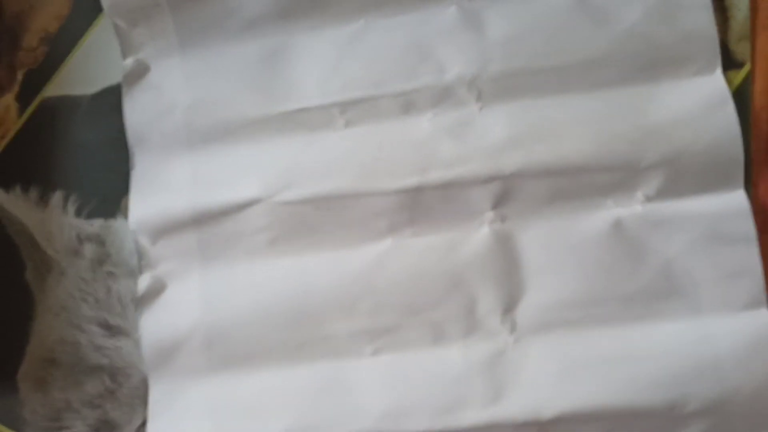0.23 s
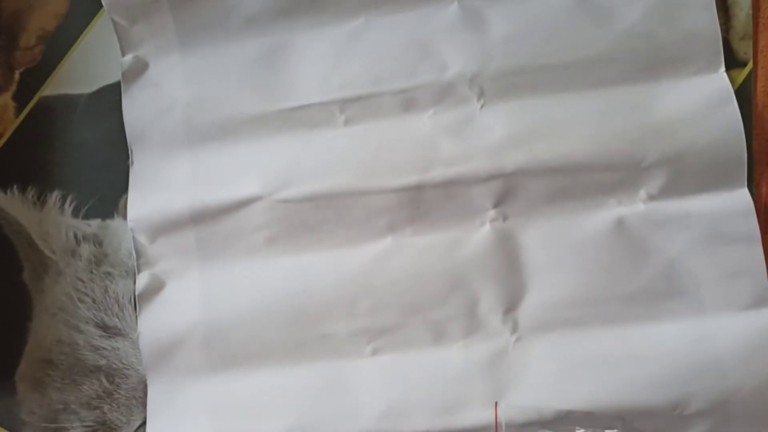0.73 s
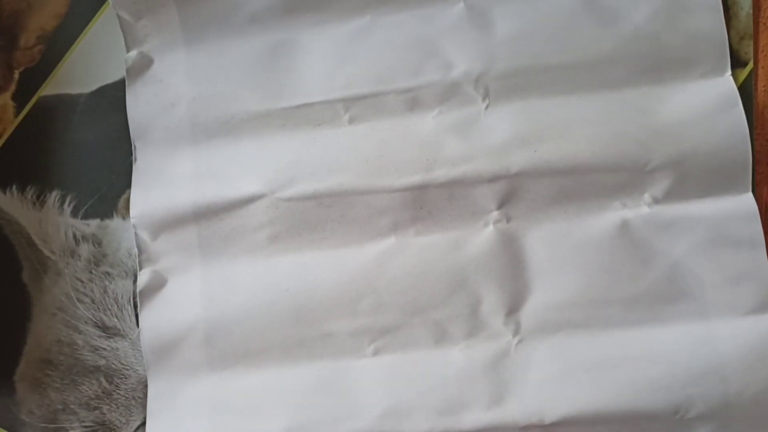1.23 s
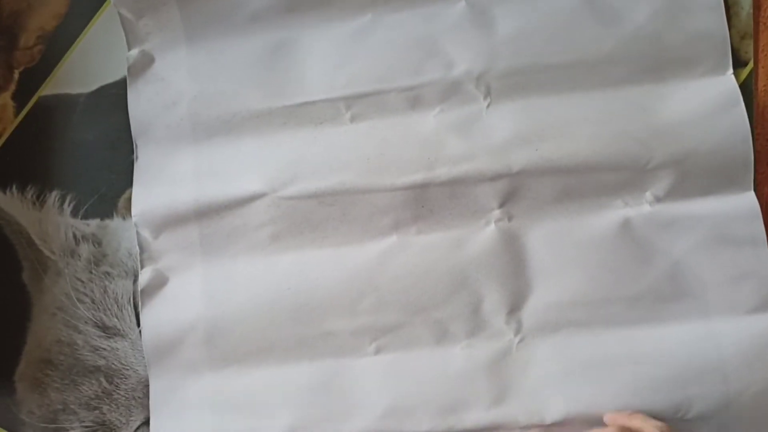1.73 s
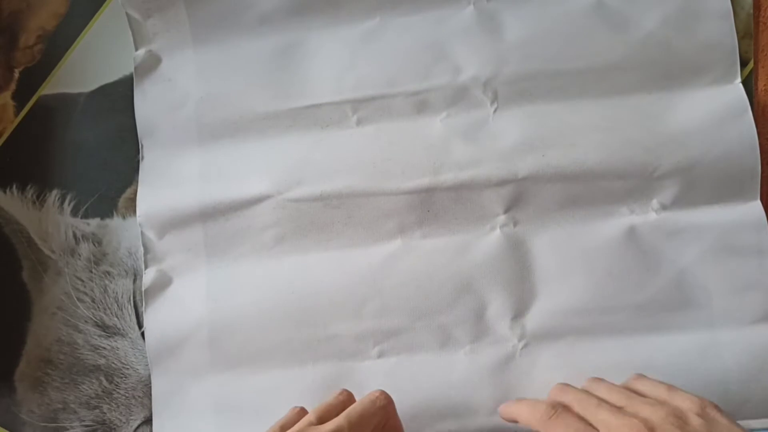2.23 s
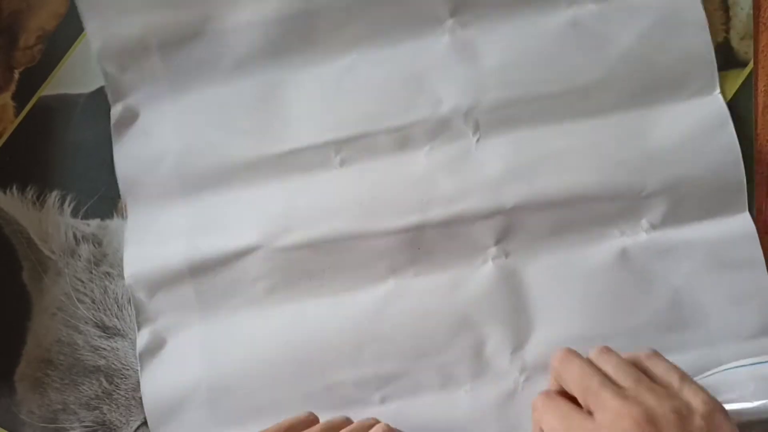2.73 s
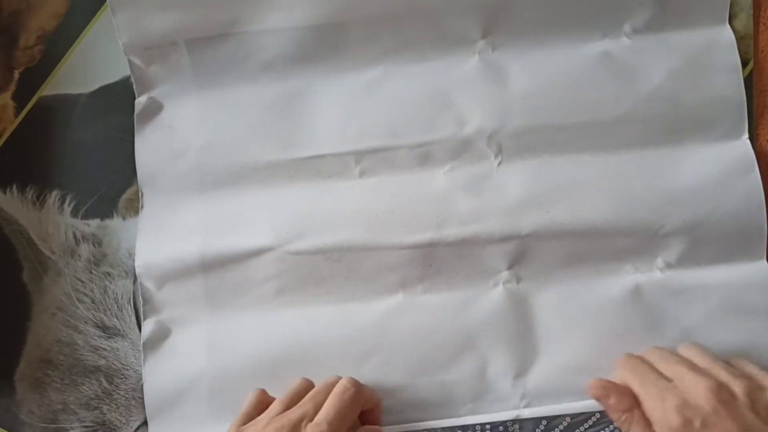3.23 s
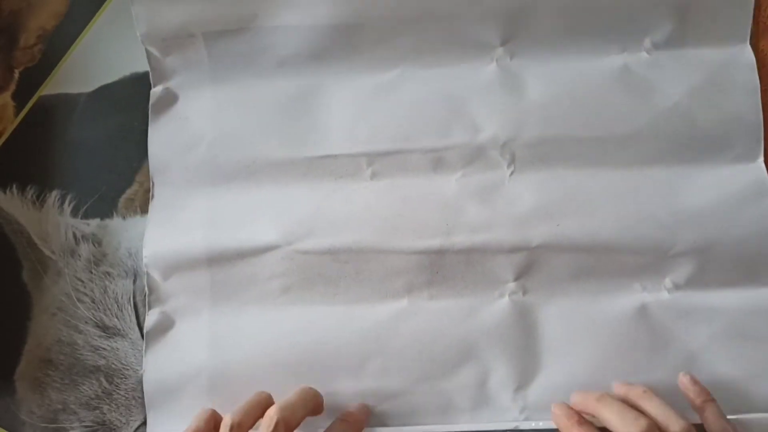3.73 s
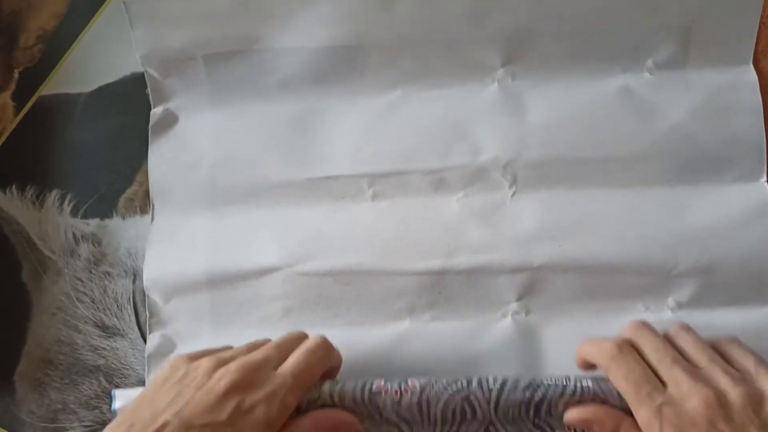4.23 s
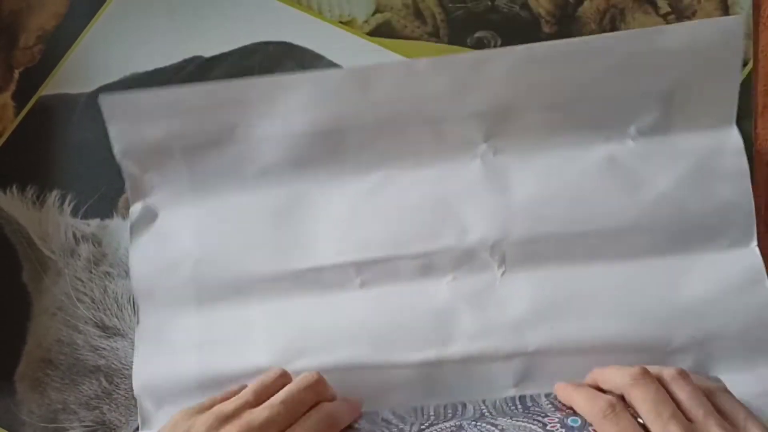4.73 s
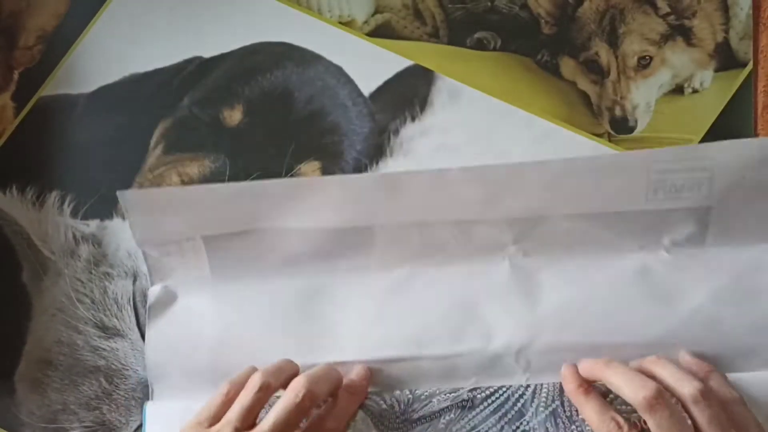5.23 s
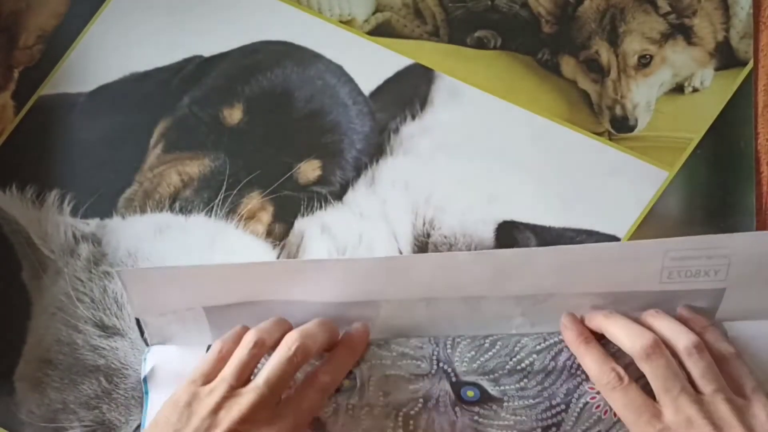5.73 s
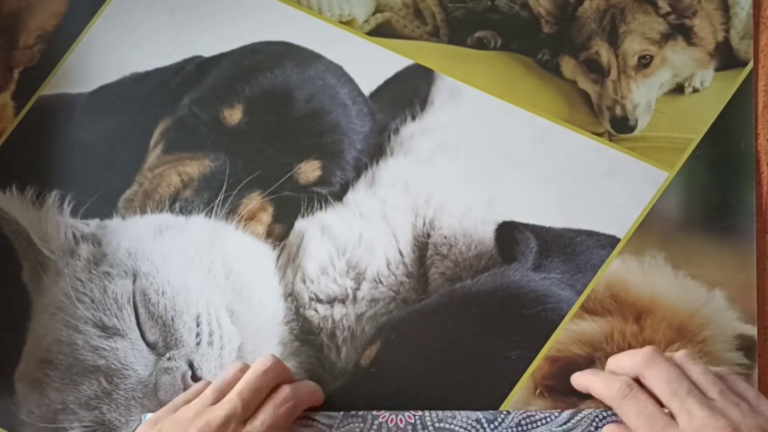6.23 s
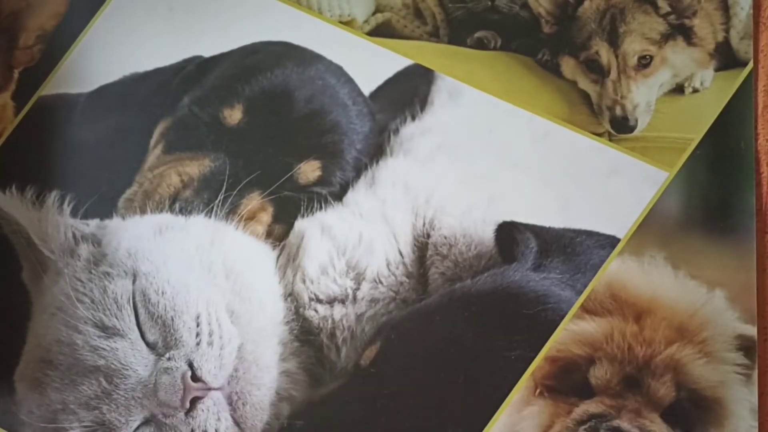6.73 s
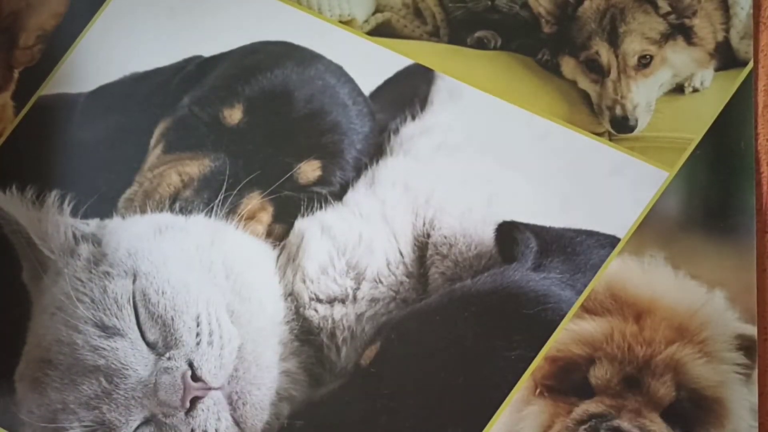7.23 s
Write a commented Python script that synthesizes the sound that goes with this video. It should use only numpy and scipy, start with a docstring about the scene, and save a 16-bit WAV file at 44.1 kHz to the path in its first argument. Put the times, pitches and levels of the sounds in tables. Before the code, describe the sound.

Close stereo sound of a coated, canvas-like sheet being pulled across a table indoors. It starts crisp and busy, with bright ticks, short grainy rubs and hollow snaps, bursts into a loud crumple at two seconds, snaps again just after three, crackles near four, then drags in gentler swishes and fades to faint room rumble.

```python
"""A quiet room: on a table, close under a phone, hands roll up a large creased, coated canvas sheet.
Sliding is grainy noise in rasp, hiss and table-top thrum, rising with each tug of the hands.
Creases buckle with short hollow pops, the coating cracks with bright ticks, flaps thump and folds scrape.
Table and walls answer briefly over a low room rumble; two microphone ports colour the treble differently."""
import sys
import numpy as np
from scipy import signal
from scipy.fft import rfft, irfft, next_fast_len
from scipy.io import wavfile
from scipy.ndimage import uniform_filter1d, map_coordinates

SR = 44100
rng = np.random.default_rng(int(sys.argv[2]) if len(sys.argv) > 2 else 0)


def volts(x):
    """Linear amplitude factor 10**(x/20) for a level x in dB, scalar or array-like."""
    e = np.asarray(x, float) / 20
    return 10 ** e


def file_out(sig):
    """Save sig as 16-bit WAV at sys.argv[1]."""
    # one column per channel
    cols = np.atleast_2d(sig).T
    # limit, then scale
    lim = np.clip(cols, -1, 1)
    pcm = np.round(lim * 32767).astype(np.int16)
    wavfile.write(sys.argv[1], SR, pcm)


N = 330309  # samples

# Tugs of the hands, each a short swish. Each row: peak time in seconds, rasp level in dB, hiss level in dB,
# rise in seconds, fall in seconds; rise and fall are each over 10 dB.
TUGS = [(.03, -45.5, -43, 0.046, 0.04), (0.093, -41, -37.5, 0.011, 0.062),
        (0.236, -38.5, -36.5, 0.018, 0.055), (.29, -56, -41, 0.016, 0.11), (.434, -43, -43.5, 0.13, 0.23),
        (.6, -40.5, -41.5, 0.011, 0.076), (0.659, -38.5, -38.5, 0.055, 0.017),
        (.738, -48.5, -42, 0.078, 0.036), (1.051, -39, -39.5, 0.026, 0.098),
        (1.167, -44, -45, 0.037, 0.016), (1.237, -36.5, -38.5, 0.022, 0.027),
        (1.33, -37, -41, 0.013, 0.091), (1.437, -41.5, -67, 0.097, 0.084), (1.54, -40, -37, 0.0054, 0.024),
        (1.578, -35, -36.5, 0.05, 0.064), (1.84, -37, -39.5, 0.12, 0.18), (2.06, -37, -38.5, 0.045, 0.1),
        (2.12, -38.5, -39.5, 0.05, 0.08), (2.205, -50, -41.5, 0.031, 0.018), (2.27, -46, -38, 0.031, 0.012),
        (2.4, -48, -49.5, 0.28, 0.12), (2.594, -38.5, -39, 0.064, 0.07), (2.784, -40.5, -39, 0.1, 0.049),
        (2.868, -41.5, -52, 0.25, 0.057), (3.028, -49.5, -65, 0.15, 0.059), (3.16, -44, -51.5, 0.054, 0.14),
        (3.238, -37, -36, 0.0099, 0.048), (3.337, -41, -51.5, 0.11, 0.097),
        (3.482, -40.5, -46.5, 0.048, 0.095), (3.622, -39, -41.5, 0.043, 0.064),
        (3.766, -38, -48.5, 0.029, 0.038), (3.84, -43.5, -44, 0.059, 0.049),
        (3.976, -44, -46, 0.016, 0.057), (4.425, -43.5, -46, 0.046, 0.025), (4.55, -55, -57, 0.026, 0.048),
        (4.738, -44, -43.5, 0.0038, 0.11), (4.785, -40.5, -42.5, 0.078, 0.24),
        (5.004, -35.5, -39.5, 0.036, 0.058), (5.103, -42.5, -69, 0.064, 0.014),
        (5.238, -49, -52.5, 0.054, 0.21), (5.417, -46, -45, 0.06, 0.05), (5.837, -65, -52.5, 0.047, 0.05),
        (5.927, -47.5, -56, 0.019, 0.084), (6.055, -43.5, -45, 0.03, 0.071),
        (6.134, -65, -34.5, 0.052, 0.068), (6.24, -47.5, -71, 0.052, 0.098), (6.6, -46, -45.5, 0.014, 0.11),
        (6.7, -55, -62, 0.13, 0.18), (7.15, -64, -62, 0.12, 0.12)]
# The sheet dragging steadily between tugs. Each row: time in seconds, rasp level in dB, hiss level in dB.
STEADY_DRAG = [(0, -63, -43.5), (.19, -56.5, -77), (.5, -62, -51), (.93, -51.5, -50), (1.7, -54.5, -49.5),
               (2.5, -48.5, -55.5), (3, -67, -53.5), (3.7, -56, -61), (4.28, -44, -44.5), (4.6, -48, -56),
               (5.2, -58.5, -75.5), (5.5, -57, -54.5), (5.7, -53.5, -57), (6, -59.5, -69), (6.4, -68, -67),
               (6.56, -52, -55), (6.77, -73, -50.5), (6.87, -90, -63.5), (7.49, -69.5, -74)]
# The sheet's weight on the table top. Each row: time in seconds, hum level in dB at a usual rasp.
SHEET_WEIGHT = [(0, -56.5), (.3, -57.5), (1.15, -58.5), (1.6, -59), (2.1, -58.5), (3.2, -60), (4.26, -56),
                (5, -58.5), (5.8, -54.5), (6.6, -50.5), (7.49, -54)]
# How crackly the sheet is: creased at first, gentler once it slides flat or is rolled.
# Each row: time in seconds, change in dB.
CRACKLINESS = [(0, 1), (3.9, -.5), (4.2, 1.5), (4.4, -2), (4.6, -8), (5, -7), (5.2, -4), (5.9, -2),
               (6.05, -9), (7.49, -3)]
# Spectrum of the sheet's rasp. Each row: frequency in Hz, relative level in dB per Hz.
RASP_SPECTRUM = [(300, -35), (650, -13), (800, -9), (1300, -3), (2500, -3), (3400, -6.5), (4200, -25.5),
                 (7000, -19.5)]
# Spectrum of the coating's hiss. Each row: frequency in Hz, relative level in dB per Hz.
HISS_SPECTRUM = [(1500, 2), (3500, 5), (5000, -3), (10000, 3), (15500, 4)]
# Spectrum of the table top's thrum. Each row: frequency in Hz, relative level in dB per Hz.
THRUM_SPECTRUM = [(90, 5), (170, 4.5), (270, 0), (325, 6.5), (375, 0.5), (428, 6.5), (520, -1), (900, -4)]
# The clearest creases buckling. Each row: start in seconds, level in dB, pitch in Hz, length in seconds.
CLEAR_POPS = [(0.081, -32, 2150, 0.0039), (0.229, -31, 2050, 0.0046), (0.281, -36, 2180, 0.0035),
              (0.3, -36, 1920, 0.0027), (0.467, -32, 2100, 0.0024), (0.58, -28.5, 2070, 0.0039),
              (0.612, -30, 1380, 0.0028), (0.655, -31.5, 1400, 0.0043), (0.773, -40.5, 1190, 0.0053),
              (1.08, -30, 1540, 0.0033), (1.114, -33, 1800, 0.0014), (1.14, -27.5, 1410, 0.0033),
              (1.165, -25.5, 1293, 0.0025), (1.1693, -27.5, 1400, 0.0045), (1.219, -30, 1020, 0.0024),
              (1.225, -30.5, 1410, .005), (1.268, -25, 2900, 0.0013), (1.3153, -30.5, 1500, 0.0023),
              (1.321, -25.5, 1680, 0.002), (1.337, -28, 1480, 0.0076), (1.5688, -28, 840, 0.0045),
              (1.577, -24.5, 1140, 0.0044), (1.588, -29, 1100, 0.0025), (1.645, -32, 1170, 0.0021),
              (1.843, -31.5, 1275, 0.0063), (1.872, -24.5, 1490, 0.0019), (1.955, -32, 1280, 0.0072),
              (1.995, -29, 1310, 0.0027), (2.0114, -26.5, 1060, 0.005), (2.0225, -20.5, 1220, 0.0029),
              (2.039, -16.5, 1130, 0.0011), (2.048, -18.5, 1263, 0.0066), (2.0653, -25, 1160, 0.0026),
              (2.0845, -18.5, 1070, 0.0017), (2.092, -26.5, 1430, 0.0076), (2.109, -33, 1190, 0.0036),
              (2.118, -23.5, 1180, 0.002), (2.139, -26, 1240, 0.0034), (2.1493, -22, 1180, 0.0035),
              (2.196, -28, 1810, 0.0019), (2.201, -26, 965, 0.0032), (2.243, -26, 1074, 0.0045),
              (2.354, -31, 2200, 0.0041), (2.3914, -33.5, 1120, 0.0065), (2.505, -36, 1600, 0.0023),
              (2.551, -33.5, 1284, 0.0063), (2.577, -31, 1180, 0.0045), (2.604, -24.5, 1300, 0.0024),
              (2.624, -32.5, 1280, 0.0078), (2.691, -26.5, 1980, 0.0038), (2.851, -35, 1210, 0.0045),
              (2.8867, -28, 1360, 0.0048), (2.901, -32.5, 1080, 0.0044), (2.9525, -39, 1300, 0.0033),
              (3.0375, -28.5, 1260, 0.0021), (3.1565, -34.5, 1450, 0.003), (3.207, -32, 1280, 0.005),
              (3.214, -34.5, 1190, 0.0028), (3.2288, -22.5, 1270, 0.0048), (3.231, -15.5, 1252, 0.0064),
              (3.239, -18.5, 1400, 0.0033), (3.242, -30, 1070, 0.0094), (3.318, -31.5, 1090, 0.0049),
              (3.398, -37, 1016, 0.008), (3.499, -34, 1153, 0.0099), (3.92, -37, 1286, 0.0076),
              (3.949, -28, 1040, 0.004), (4.137, -36, 1116, 0.0052), (4.2437, -29, 970, 0.0027),
              (4.294, -36, 2640, 0.0018), (4.3434, -31, 960, 0.0046), (5.102, -38, 1640, 0.0092),
              (5.186, -44.5, 1440, 0.0028), (5.288, -37, 620, 0.0053), (5.335, -40.5, 1180, 0.0042),
              (5.685, -44, 1480, 0.0017), (5.788, -35, 1620, 0.0015), (5.892, -44.5, 1210, 0.009),
              (5.965, -40.5, 1880, 0.0036), (5.916, -39.5, 1160, 0.0045), (5.927, -47, 1610, 0.0051),
              (6.329, -44.5, 750, 0.0055), (6.862, -52, 760, 0.0044), (6.94, -50, 1000, 0.002),
              (6.9628, -46.5, 920, 0.0024), (7.353, -49.5, 1020, 0.0032)]
# The clearest cracks of the coating. Each row: start in seconds, level in dB, pitch in Hz.
CLEAR_TICKS = [(0.028, -28, 8100), (0.0408, -26, 14000), (0.0803, -20, 11500), (0.2323, -27, 12100),
               (0.24, -20, 12800), (0.246, -25, 11600), (0.2507, -28, 12300), (0.2967, -25, 8400),
               (0.3024, -21, 12600), (0.3922, -28, 5500), (0.4254, -18, 11900), (0.441, -23, 13600),
               (0.4646, -20, 12700), (0.5822, -25.5, 14200), (0.6538, -18.5, 11500), (0.6584, -30, 4830),
               (0.7405, -20.5, 12400), (0.7669, -25, 13800), (0.8566, -32, 5300), (1.166, -32, 8000),
               (1.229, -33, 5760), (1.2665, -30, 12600), (1.2717, -34, 12100), (1.3154, -25, 13300),
               (1.322, -22.5, 11900), (1.3357, -23, 9000), (1.375, -27, 6440), (1.4769, -26.5, 8150),
               (1.5197, -30, 8500), (1.542, -18, 11900), (1.7327, -27, 6800), (1.8752, -28, 5700),
               (2.0276, -19, 11700), (2.0844, -28, 12400), (2.1222, -30, 12500), (2.1384, -18, 12500),
               (2.1976, -21, 14000), (2.5924, -23, 12500), (2.692, -36, 11900), (2.8438, -33, 5360),
               (2.888, -32, 12800), (3.2304, -26.5, 7740), (3.4426, -27, 12100), (3.5401, -32.5, 12200),
               (3.5774, -34, 12400), (3.8916, -33, 11900), (3.966, -33, 12100), (3.9773, -30, 12200),
               (4.0038, -29, 6300), (4.0281, -30, 12100), (4.0487, -27, 8000), (4.1093, -28, 7300),
               (4.1325, -19, 7900), (4.1548, -18.5, 7700), (4.1863, -21, 8000), (4.211, -29, 5740),
               (4.2228, -25, 7650), (4.2373, -26, 6500), (4.261, -24.5, 6400), (4.6564, -30.5, 12000),
               (4.7065, -34, 12100), (5.1953, -35.5, 6700), (5.2893, -34, 12200), (5.6097, -28, 11900),
               (5.6854, -39, 11700), (5.9998, -44.5, 6400), (6.94, -37, 13000), (7.1423, -48, 11850),
               (7.3524, -59, 11500)]
# Spectrum of the splash in a crack. Each row: frequency in Hz, relative level in dB per Hz.
CRACK_SPECTRUM = [(1500, -11), (3000, -0.5), (5000, -3), (10000, 10.5), (15500, 8)]
# Fingers and folds scraping. Each row: start in seconds, length in seconds, start pitch in Hz,
# end pitch in Hz, bandwidth in Hz, level in dB.
SCRAPES = [(0.111, 0.047, 2400, 2320, 250, -46.5), (1.032, 0.037, 1253, 1250, 110, -40.5),
           (1.401, 0.053, 1207, 1170, 90, -40.5), (3.315, 0.04, 1147, 1146, 196, -44),
           (3.612, 0.022, 868, 1266, 100, -41.5), (3.759, 0.038, 1974, 2160, 295, -44.5),
           (3.819, 0.045, 2060, 2147, 537, -36.5), (4.404, 0.037, 1075, 890, 121, -37),
           (4.406, 0.04, 2110, 1400, 367, -39.5), (4.966, 0.056, 823, 1060, 89, -41.5),
           (4.962, 0.056, 1610, 2190, 149, -37), (4.959, 0.054, 2450, 3290, 387, -40),
           (5.013, 0.05, 1592, 1814, 398, -38), (5.785, .085, 6400, 6760, 585, -63),
           (6.104, 0.066, 2050, 2310, 308, -45.5), (6.518, 0.092, 562, 800, 196, -53.5),
           (6.563, 0.075, 1513, 2277, 600, -44), (6.598, 0.085, 2063, 1344, 516, -50.5),
           (6.599, .07, 3000, 3500, 600, -54), (6.659, 0.12, 955, 1160, 397, -51)]
# The sheet slapping the table. Each row: start in seconds, level in dB, pitch in Hz.
THUMPS = [(0.0809, -41, 460), (1.1172, -38, 344), (1.139, -38, 530), (1.1636, -32.5, 330),
          (2.0486, -31, 420), (2.2, -44, 420), (2.4536, -45.5, 346), (2.5867, -44, 480), (3.4984, -43, 357),
          (4.1364, -45, 378), (5.335, -45.5, 620), (5.7304, -44.5, 367), (5.9193, -48, 386),
          (6.0523, -46, 322), (6.963, -49, 228)]
# Decay of table and walls. Each row: frequency in Hz, time to fall 60 dB in seconds.
WALL_DECAY = [(300, 0.35), (1200, 0.15), (4000, 0.18), (12000, 0.14)]
# Spectrum of the quiet room. Each row: frequency in Hz, relative level in dB per Hz.
ROOM_SPECTRUM = [(18, -28), (30, -3.5), (97, 9), (505, -11), (656, -11.5), (830, -11.5), (2420, -48),
                 (9680, -33), (11900, -23), (15500, -28)]
# The rumble comes up at the end. Each row: time in seconds, rise in dB.
ROOM_RISE = [(0, 1), (6.8, 2), (7.2, 6), (7.49, 4.5)]
# Likeness of left and right. Each row: frequency in Hz, correlation from 0 to 1.
LIKENESS = [(60, 0.13), (150, 0.49), (380, 0.76), (950, 0.59), (2380, 0.072), (5980, 0.085), (15000, 0.54)]
# Response of the microphone ports. Each row: frequency in Hz, left gain in dB, right gain in dB.
PORT_RESPONSE = [(29.8, -11, -16.5), (100, -4.5, -2.5), (800, 2, 1.5), (3230, -0.5, -2.5), (4940, 4.5, 4),
                 (5800, 7.5, 0), (6400, 6, 4.5), (8100, 4, -7.5), (10200, -5.5, -2.5), (11500, -9.5, 0),
                 (11700, -4, 6.5), (13250, -9, 4), (15750, -6, -5.5), (16100, -38, -40)]


def handling():
    """Levels of rasp and hiss in dB: the steady drag and every tug of the hands, added as power."""
    t = np.arange(0, N, 32) / SR
    power = 0
    for s, rasp_db, hiss_db, rise, fall in TUGS:
        below_peak_db = 10 * np.where(t < s, (s - t) / rise, (t - s) / fall)
        power = power + volts([[rasp_db], [hiss_db]] - below_peak_db) ** 2
    tugs = np.array([np.interp(np.arange(N) / SR, t, p) for p in power])
    return 10 * np.log10(tugs + volts(curves(STEADY_DRAG)) ** 2)


def slide(rasp_db, hiss_db):
    """Friction on the table: rasp of the sheet, hiss of the coating, thrum of the top."""
    # the top hums along with the rasp, smoothed and swinging less widely
    usual_rasp_db, follow, smooth_s = -46, 0.7, 0.038
    smooth_rasp_db = uniform_filter1d(rasp_db, round(smooth_s * SR))
    thrum_db = curves(SHEET_WEIGHT)[0] + follow * (smooth_rasp_db - usual_rasp_db)

    grains = grainy(170, size_db=3.5, life_s=0.0012, grain_db=-0.7)
    hz, t, z = signal.stft(grains, SR, nperseg=256)
    # changing panels of the sheet favour changing bands
    panels = uniform_filter1d(rng.standard_normal(z.shape[1:]), size=3, axis=0)
    panels = uniform_filter1d(panels, size=8, axis=1)
    # a hissier stroke also rasps higher
    frame_at = np.minimum(t * SR, N - 1).astype(int)
    brightness = np.clip(hiss_db - rasp_db, -8, 8)[frame_at]
    tilt_db = 0.55 * brightness * np.log2(np.clip(hz, 400, 4000) / 1400)[:, None]
    shaped = z * volts(2.6 * unit(panels) + tilt_db)

    rasp = unit(spread(signal.istft(shaped, nperseg=256)[1][:, :N], RASP_SPECTRUM))
    hiss = unit(spread(grainy(190, size_db=3.5, life_s=0.00074, grain_db=2), HISS_SPECTRUM))
    thrum = unit(spread(grainy(40, size_db=4.0, life_s=0.017, grain_db=-5), THRUM_SPECTRUM))
    jerk_db = 1.14 * wobble(45)  # the hands move unevenly
    return volts(rasp_db + jerk_db) * rasp + volts(hiss_db + jerk_db) * hiss + volts(thrum_db + jerk_db) * thrum


def pops(rasp_db):
    """A crease snaps through: a few cycles at its pitch in a puff of rasp, and the sheet shivers on after it."""
    rings, puffs = np.zeros((2, N + SR)), np.zeros((2, N + SR))
    t = np.arange(SR // 12) / SR
    # lesser creases at random moments, their strength following the rasp
    s, db, high, long = lesser(rasp_db + 7.5, count=70)
    small = zip(s, db, 1390 * 2 ** (0.436 * high), 0.0025 * np.exp(0.53 * long))
    for s, db, hz, length in CLEAR_POPS + list(small):
        shape = swell(t, 0.095 * length, 0.79 * length)
        side = volts(rng.normal(0, 3.44) * np.array([[1], [-1]]))  # leans left or right
        add(rings, s, volts(db) * side * shape * uneven_ring(t, hz, wander=0.12))
        # the fold's edge, higher
        edge = uneven_ring(t, hz * rng.uniform(1.634, 2.76), wander=0.13)
        add(rings, s, volts(db - 9.5) * side * swell(t, 0.00035, 0.8 * length) * edge)
        shiver = volts(-28.5) * np.exp(-t / (3 * length))
        puff = volts(-9.0) * shape + shiver
        add(puffs, s, volts(db) * side * puff * rng.standard_normal((2, len(t))))
    thin = signal.butter(2, 2 * 450 / SR, 'high')  # keeps the short pops free of low thud
    return signal.lfilter(*thin, rings[:, :N]) + spread(puffs[:, :N], RASP_SPECTRUM)


def ticks(hiss_db):
    """Each crack is a sharp ring near its pitch in a splash of bright noise, and the table throws it back once."""
    rings, splashes = np.zeros((2, N + SR)), np.zeros((2, N + SR))
    t = np.arange(SR // 25) / SR
    # lesser cracks at random moments, their strength following the hiss
    s, db, high, _ = lesser(hiss_db + 10, count=130)
    small = zip(s, db, np.clip(9000 * 2 ** (0.4 * high), 4000, 15000))
    for s, db, hz in CLEAR_TICKS + list(small):
        decay_s = 0.00045 * np.exp(rng.normal(0, 0.25))
        shape = (1 - np.exp(-t / 0.00005)) * np.exp(-t / decay_s)
        # reaches the ports in unrelated phase
        ring = shape * [uneven_ring(t, hz, wander=0.36)[port] for port in range(2)]
        burst = (shape + volts(-18) * np.exp(-t / 0.0038)) * rng.standard_normal((2, len(t)))
        burst = burst * np.linalg.norm(shape) / np.linalg.norm(burst, axis=1, keepdims=True)
        # direct sound, then the table echo
        for late_s, gain_db in [(0, 0), (0.0013, -6.5)]:
            add(rings, s + late_s, volts(db + gain_db + 2.5) * ring)
            add(splashes, s + late_s, volts(db + gain_db - 0.5) * burst)
    return rings[:, :N] + spread(splashes[:, :N], CRACK_SPECTRUM)


def scrapes():
    """Stick and slip sings in a band: a gliding tone, part steady, the rest wavering faster in a wider band."""
    out = np.zeros((2, N + SR))
    for s, length, start_hz, end_hz, width_hz, db in SCRAPES:
        u = np.linspace(0, 1, round(length * SR))
        turns = np.cumsum(start_hz + (end_hz - start_hz) * u) / SR + rng.random()
        tone = np.exp(2j * np.pi * turns)
        knots = rng.standard_normal((6, int(length * 2000) + 4))
        knot_at = 2 * u * length * min(width_hz, 1000)
        waver = np.array([map_coordinates(k, [knot_at]) for k in knots])
        waver = waver[:3] + 1j * waver[3:]  # one shared, one for each side
        steady = np.exp(-width_hz / 80)
        band = (tone * (2 * steady + (1 - steady) * (waver[0] + 0.5 * waver[1:]))).real
        add(out, s, volts(db) * np.sin(np.pi * u) * unit(band))
    return out[:, :N]


def thumps():
    """A flap of sheet lands and the table top answers with a few low cycles."""
    out, t = np.zeros((2, N + SR)), np.arange(SR // 12) / SR
    for s, db, hz in THUMPS:
        add(out, s, volts(db) * swell(t, 0.0013, 0.0086) * uneven_ring(t, hz, wander=0.062))
    return out[:, :N]


def walls(x):
    """Table and walls answer, each frequency dying at its own speed: a fresh random echo tail every quarter second."""
    out, step = np.zeros((2, N + SR)), SR // 4
    for start in range(0, N, step):
        hz, t, z = signal.stft(rng.standard_normal((2, SR // 5)), SR, nperseg=256)
        decay = volts(-60 * t / along(WALL_DECAY, hz)[:, None])
        shared = z + 0.68 * z[::-1]  # left and right partly alike
        tail = signal.istft(shared * decay, SR, nperseg=256)[1]
        tail = tail / np.linalg.norm(tail[0])
        echo = signal.fftconvolve(x[:, start:start + step], tail, axes=1)
        add(out, start / SR + 0.003, echo)
    return out[:, :N]


def room_tone():
    """Low rumble of the house and a faint hiss: coloured noise at a slowly wavering level."""
    rise_db, = curves(ROOM_RISE)
    level_db = -66.5 + rise_db + 0.53 * wobble(4.2)
    return volts(level_db) * unit(spread(rng.standard_normal((2, N)), ROOM_SPECTRUM))


def lesser(level_db, count):
    """Random moments while creases remain, each with a strength scattered about the level, and two spare draws."""
    creases_end_s = 5.7
    where = (rng.random(count) * creases_end_s * SR).astype(int)
    scatter, spare_a, spare_b = rng.standard_normal((3, count))
    db = (level_db + curves(CRACKLINESS)[0])[where] + 2 * np.clip(scatter, -3, 1)
    return where / SR, db, spare_a, spare_b


def grainy(per_s, size_db, life_s, grain_db):
    """Noise whose strength jumps at tiny random slips of the surface and dies away after each."""
    size = np.minimum(rng.exponential(size=N), 2.5)
    slips = (rng.random(N) < per_s / SR) * volts(size_db * size + curves(CRACKLINESS)[0])
    jumps = signal.lfilter([1], [1, -np.exp(-1 / (life_s * SR))], slips)
    return (1 + volts(grain_db) * jumps) * rng.standard_normal((2, N))


def uneven_ring(t, hz, wander):
    """A tone whose phase drifts, partly apart in left and right."""
    walk = np.cumsum(rng.standard_normal((3, len(t))), axis=1)
    turns = hz * t + rng.random()
    return np.sin(2 * np.pi * turns + wander * (walk[0] + 0.21 * walk[1:]))


def swell(t, rise, length):
    """Quick rise, rounded end."""
    return (1 - np.exp(-t / rise)) * np.exp(-(t / length) ** 2)


def spread(pair, spectrum):
    """Two unrelated signals coloured and made into left and right, as alike as LIKENESS; white noise keeps its rms."""
    ends = [(0.52, -120)] + list(spectrum) + [(SR / 2, -40)]

    def response(hz):
        turn = np.arccos(np.clip(along(LIKENESS, hz), 0, 1)) / 2
        return unit(volts(along(ends, hz))) * [np.cos(turn), np.sin(turn)]

    mid, side = filtered(pair, response)
    return np.array([mid + side, mid - side])


def filtered(x, response):
    """x times a response of frequency."""
    m = next_fast_len(N + SR // 2)
    return irfft(rfft(x, m) * response(np.fft.rfftfreq(m, 1 / SR)), m)[..., :N]


def along(points, hz, column=1):
    """A column of rows that start with Hz, read on a log axis."""
    rows = np.transpose(points)
    return np.interp(np.log(hz + 1), np.log(rows[0] + 1), rows[column])


def curves(rows):
    """One value per sample for each column after the time."""
    s, *columns = np.transpose(rows)
    return [np.interp(np.arange(N) / SR, s, c) for c in columns]


def wobble(rate):
    """A smooth random curve, rate knots a second."""
    knots = rng.standard_normal(int(N * rate / SR) + 4)
    return map_coordinates(knots, [np.arange(N) * rate / SR])


def unit(x):
    """x scaled to an rms of 1."""
    return x / np.sqrt(np.mean(x ** 2) + 1e-20)


def add(out, s, sound):
    """Mixes a short sound in at time s."""
    out[..., max(round(s * SR), 0):][..., :sound.shape[-1]] += sound


def scene():
    """The sheet's snaps, cracks and sliding, the answer of table and walls, and the room beneath."""
    rasp_db, hiss_db = handling()
    snaps = pops(rasp_db) + thumps() + scrapes()
    cracks = ticks(hiss_db)
    echoes = volts(-7.5) * walls(snaps + cracks)
    return snaps + cracks + echoes + slide(rasp_db, hiss_db) + room_tone()


def roll_off(x):
    """The treble ends steeply here."""
    return signal.sosfilt(signal.butter(12, 16980, fs=SR, output="sos"), x)


def record(dry):
    """The two microphone ports, each with its own treble resonance."""
    ports = filtered(dry, lambda hz: volts([along(PORT_RESPONSE, hz, column=c) for c in (1, 2)]))
    return roll_off(ports)


dry = scene()
out = record(dry)
file_out(out)
```